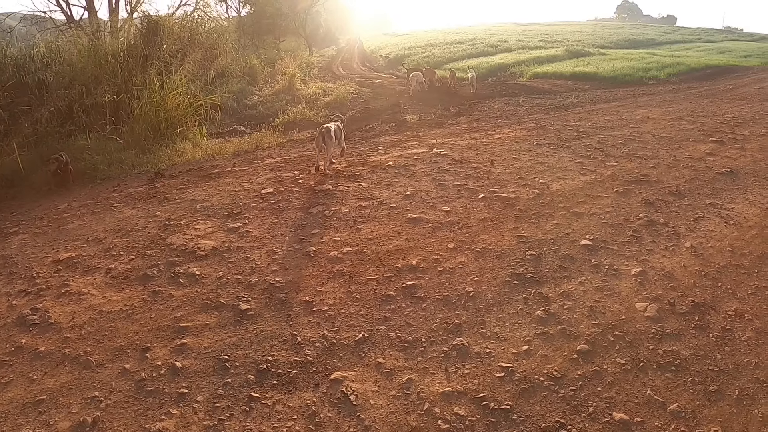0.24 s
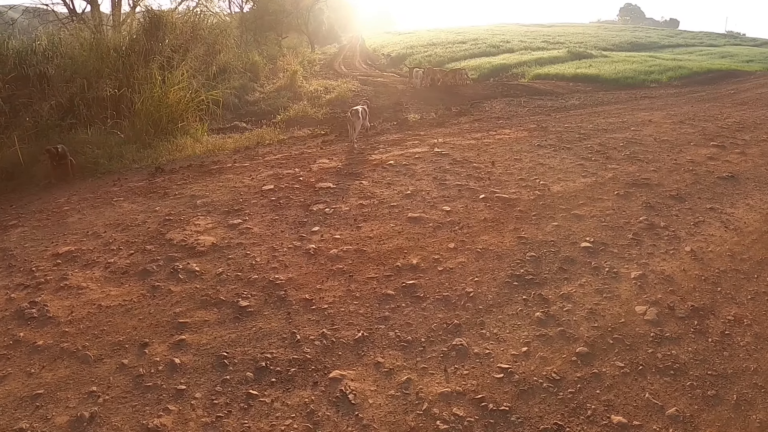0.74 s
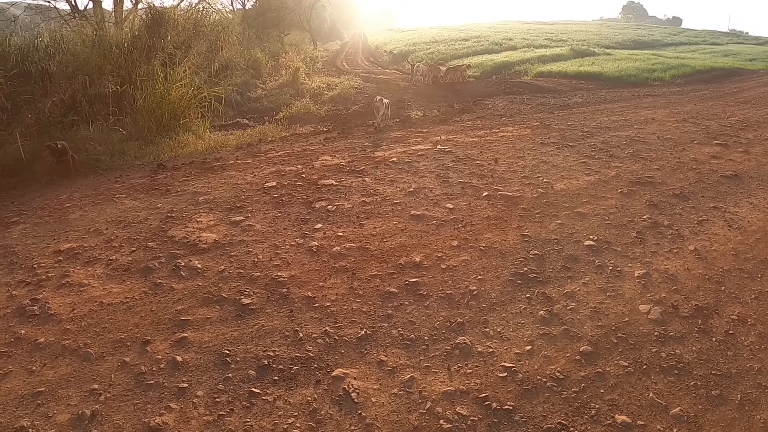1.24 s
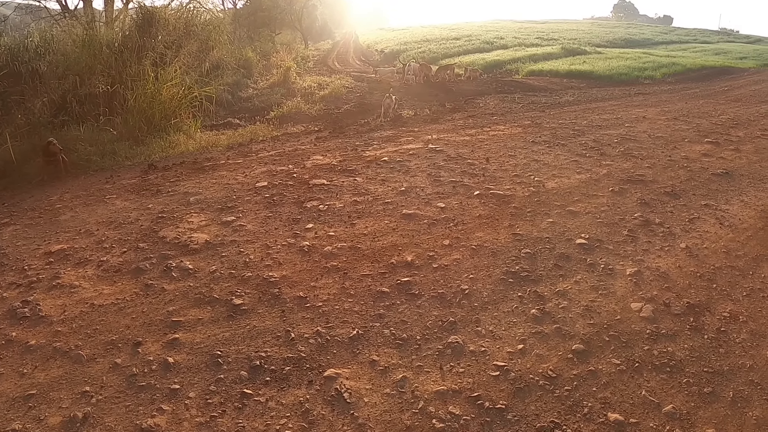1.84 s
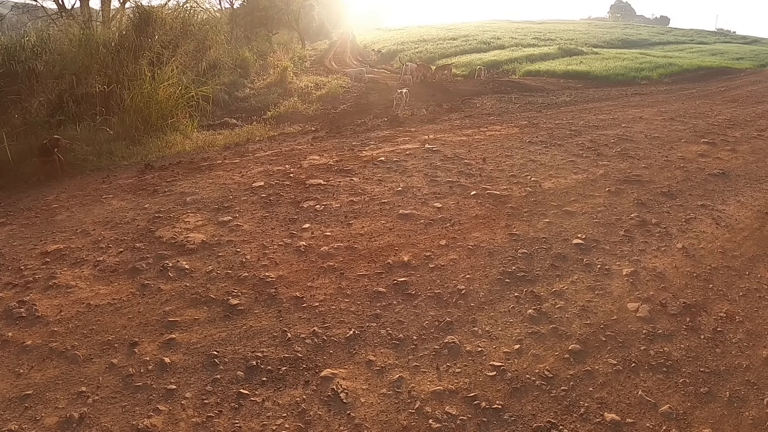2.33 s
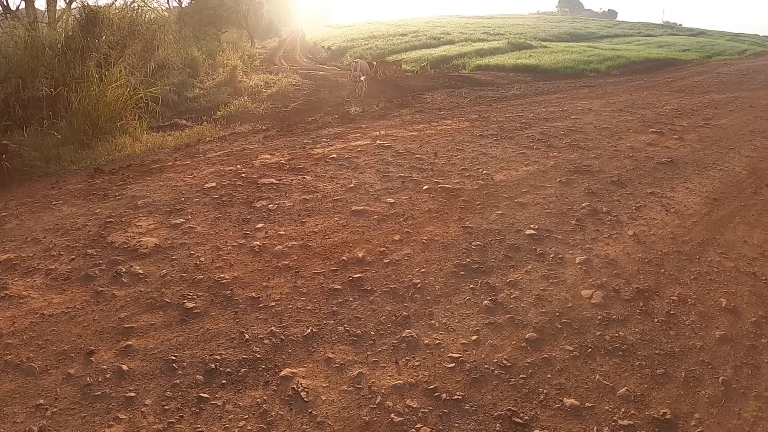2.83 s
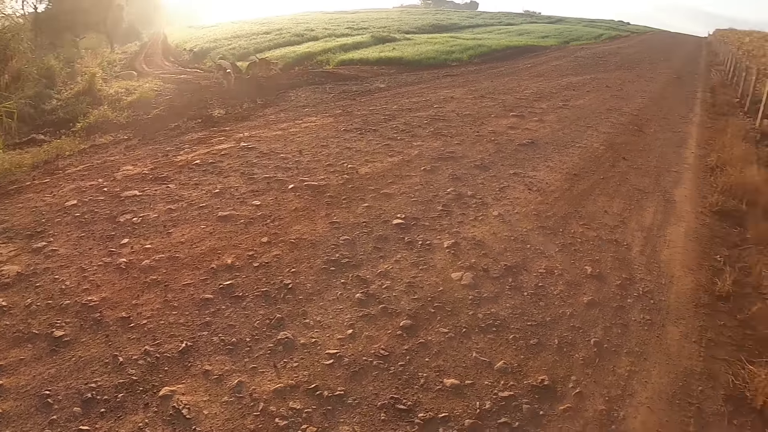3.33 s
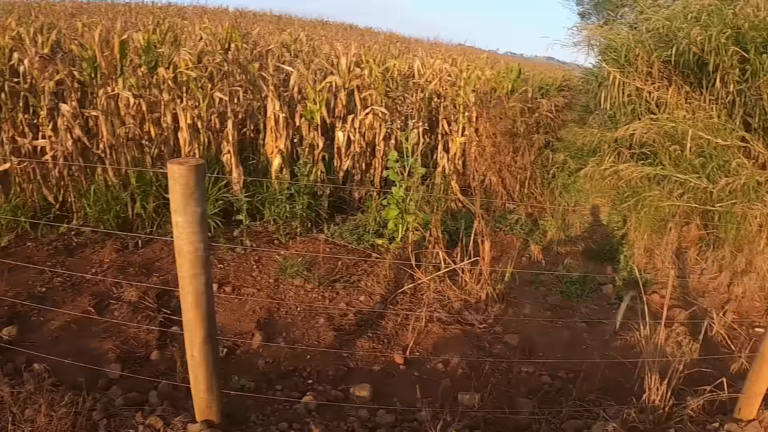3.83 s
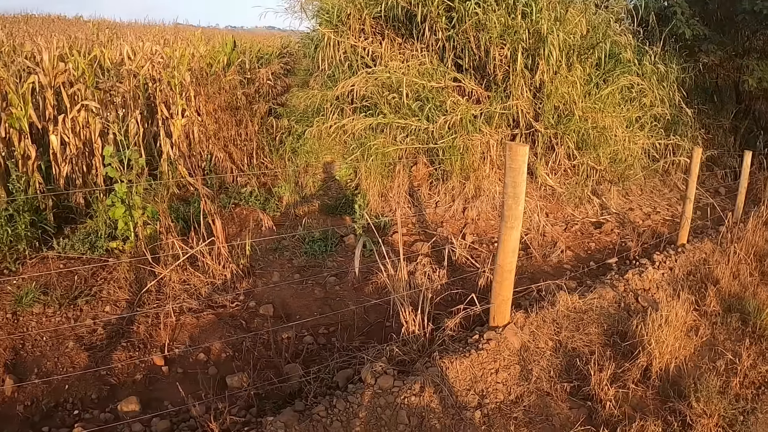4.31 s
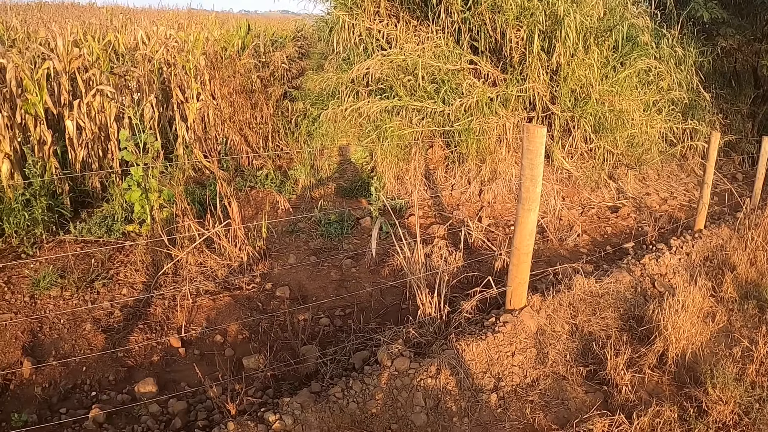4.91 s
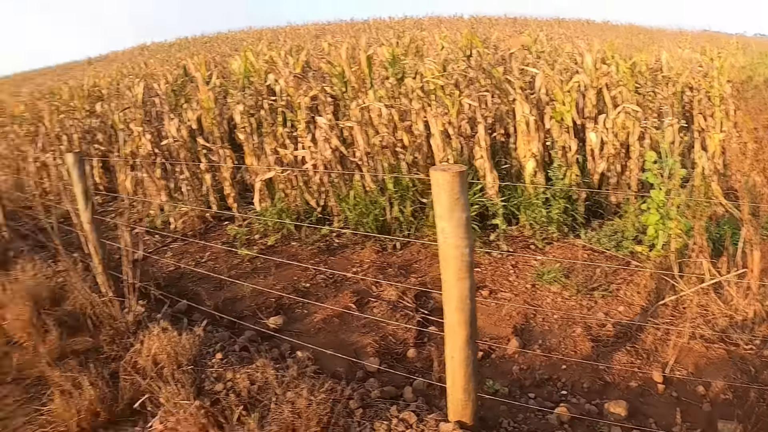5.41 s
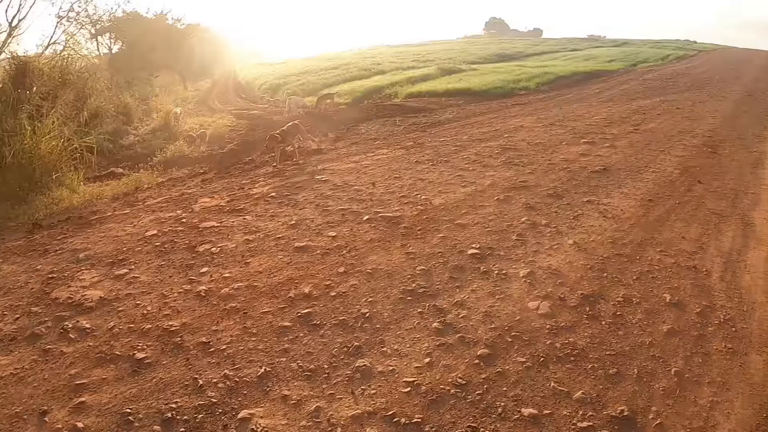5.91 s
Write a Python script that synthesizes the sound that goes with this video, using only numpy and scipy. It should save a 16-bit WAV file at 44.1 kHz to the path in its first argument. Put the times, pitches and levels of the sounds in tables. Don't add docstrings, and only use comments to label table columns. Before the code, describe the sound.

A dog's piercing two-toned yelp opens, thin whines and a drawn-out howl follow, then twigs and a loose strap crackle near the microphone in a quiet field.

```python
import sys
import numpy as np
from scipy import signal
from scipy.fft import rfft, irfft, next_fast_len
from scipy.io import wavfile
from scipy.ndimage import uniform_filter1d

SR = 44100
rng = np.random.default_rng(int(sys.argv[2]) if len(sys.argv) > 2 else 0)


def master(y):
    cut = np.clip(np.atleast_2d(y).T, -1, 1)
    pcm = np.round(cut * 32767)
    wavfile.write(sys.argv[1], SR, pcm.astype(np.int16))


N = 271391
T = np.arange(N) / SR
SQUEAK_PAN_DB = 5

# time_s, width_db
WIDTH = [(0, -51), (2.0, -25), (2.3, -15.5), (2.7, -6), (3.2, -1), (6.15, 0)]
# start_s, hold_s, wind_db, rustle_db
SWINGS = [(0.044, 0.0261, -95, -61.5), (0.131, 0.0227, -95, -66.5), (0.198, 0.1092, -96, -71),
          (3.305, 0.2594, -77, -97), (3.813, 0.21527, -51, -94), (4.599, 0.3924, -69, -74),
          (5.308, 0.1169, -52, -62.5), (5.541, 0.0306, -64.5, -64.5), (5.706, 0.00733, -37, -62),
          (5.786, 0.08247, -55.5, -58), (5.894, 0.07665, -60, -64.5), (6.133, 0.03994, -63, -58)]
# start_s, level_db, pitch_factor, length_factor, low_voice_db
CALLS = [
    (.178, -26, 1.001, 1.001, 0.4009),
    (4.012, -44.5, .95, 1.03, 5),
]


def undb(db):
    return np.exp(np.asarray(db) * (np.log(10) / 20))


def curve(rows):
    s, *columns = np.transpose(rows)
    return [np.interp(T, s, c) for c in columns]


def shape(points, hz):
    f, db = np.transpose(points)
    return np.interp(np.log(hz), np.log(f), db)


def swells(rows, rise_db_s, fall_db_s, floor_db):
    each = []
    for s, hold, db in rows:
        rise_db = rise_db_s * np.maximum(s - T, 0)
        fall_db = fall_db_s * np.maximum(T - s - hold, 0)
        each.append(db - rise_db - fall_db)
    return np.maximum(np.max(each, axis=0), floor_db)


def unit(x):
    return x / np.sqrt(np.mean(x ** 2))


def band(x, lo_hz, hi_hz):
    return signal.sosfilt(signal.butter(2, [lo_hz, min(hi_hz, .45 * SR)], "band", fs=SR, output="sos"), x)


def tinted(points, size=N):
    n = next_fast_len(size)
    hz = np.maximum(np.arange(n // 2 + 1) * SR / n, 1)
    return irfft(rfft(rng.standard_normal(n)) * undb(shape(points, hz)), n)[:size]


def walk(rate, size=N):
    knots = rng.standard_normal(int(size * rate / SR) + 2)
    return 1.2 * np.interp(np.arange(size) * (rate / SR), np.arange(len(knots)), knots)


def sparse_grains(size):
    struck = rng.random(size) < .08
    return rng.standard_normal((2, size)) * struck * undb(2.0 * rng.exponential(size=size))


def panned(x, pan_db):
    left = 2 / (1 + undb(-pan_db))
    return np.array([x * left, x * (2 - left)])


def spread(mid, side):
    return mid + side * np.array([[1], [-1]])


def stereo_width():
    return undb(curve(WIDTH)[0])


def strand(rows, smooth_s, edge_s):
    s, *columns = np.transpose(rows)
    at = np.arange(int(s[0] * SR), int(s[-1] * SR))
    gate = np.clip(np.minimum(at - at[0], at[-1] - at) / (edge_s * SR), 0, 1)
    smooth = [uniform_filter1d(np.interp(at / SR, s, c), int(smooth_s * SR), mode="nearest") for c in columns]
    return at, gate, smooth


def field():
    # frequency_hz, level_db_per_hz
    early_hush = [(30, 6.5), (60, -4.5), (115, -18), (270, -25.5), (500, -31), (600, -24.5), (950, -32),
                  (2100, -35.5), (3000, -34.5), (3800, -38.5), (7700, -45), (8800, -56.5), (12000, -64.5),
                  (15500, -97.5)]
    late_hush = [(30, -5), (85, -3.5), (180, -16.5), (430, -21.5), (750, -27.5), (1300, -25.5), (2700, -37),
                 (3500, -34), (4400, -42.5), (7700, -46), (8800, -59.5), (12000, -75), (15500, -94.5)]
    # frequency_hz, side_minus_mid_db
    side_tilt = [(60, -24), (110, -25.5), (200, -17), (380, -18), (700, -11.5), (1290, -9), (2380, -5),
                 (4400, -1), (8120, -0.5), (15000, 0)]
    # start_s, hold_s, lift_db
    stirs = [
        (.22, 0.025, 11.5),
        (5.66, 0.1, 7),
        (5.9, 0.43, 9.5),
    ]
    # start_s, hold_s, depth_db
    duck = [
        (2.72, 1, 2),
    ]
    # pitch_hz, level_db
    whine = [(151, -65.5), (614, -71), (1222, -78.5)]

    before = np.clip((2.25 - T) / 0.0674, 0, 1)
    stir_db, duck_db = swells(stirs, 22.71, 38.77, 0), swells(duck, 100, 9, 0)
    settle_db = 3.5 * np.clip((4.3273 - T) / 1, 0, 1)
    low_db = -68.5 + 0.6272 * stir_db - .3 * duck_db
    high_db = -81 + 0.8999 * stir_db - duck_db + settle_db

    n = next_fast_len(N)
    hz = np.maximum(np.arange(n // 2 + 1) * SR / n, 1)
    share = np.clip(np.log(hz / 900) / np.log(4), 0, 1)

    def levelled(points):
        low_ref, high_ref = shape(points, 399) + 24.038, shape(points, 7650) + 30.351
        return shape(points, hz) - (1 - share) * low_ref - share * high_ref

    early, late = levelled(early_hush), levelled(late_hush)
    colours = (early, late, late + shape(side_tilt, hz))
    noises = [rfft(rng.standard_normal(n)) * undb(db) * np.sqrt(SR / 2) for db in colours]
    out, width = np.zeros((2, N)), stereo_width()
    for octave in range(9):
        window = np.cos(np.pi / 2 * np.clip(np.log2(hz / 50) - octave, -1, 1)) ** 2
        mono, mid, side = (irfft(x * window, n)[:N] for x in noises)
        high = np.clip(np.log(50 * 2 ** octave / 900) / np.log(4), 0, 1)
        flicker_db = 2.1 * walk(7)
        gain = undb((1 - high) * low_db + high * high_db - 1.0647 * (octave < 7) + flicker_db)
        out += gain * spread(np.sqrt(before) * mono + np.sqrt(1 - before) * mid, width * side)
    hum = 0
    for f, db in whine:
        hum = hum + undb(db + 3.15 * walk(6.7354)) * np.sin(2 * np.pi * f * T + 0.2269 * walk(9.1754))
    return out + np.sqrt(2) * before * hum


def engine():
    # multiple_of_firing, level_db under the firing tone
    half_orders = [(.5, -14), (1.5, -10), (2.5, -21.5), (3, -27)]
    idle_hz, revved_hz = 34.613, 37.878
    rev = np.clip((T - 1.6) / .3, 0, 1)
    load = np.clip((T - 2.4) / 0.2127, 0, 1)
    hz = idle_hz + (revved_hz - idle_hz) * rev
    firing_db = -46.5 + 1 * load
    octave_db = -57.5 + 4 * load
    phase = 2 * np.pi * np.cumsum(hz * (1 + 0.014 * walk(13))) / SR
    out = undb(firing_db + 0.65 * walk(7.2)) * np.sin(phase)
    out += undb(octave_db + 1.4 * walk(5.3)) * np.sin(2 * phase + 1)
    for k, db in half_orders:
        out += undb(firing_db + db + 0.86 * walk(13.0)) * np.sin(k * phase + 0.58 * walk(2.3))
    return np.sqrt(2) * out


def insect():
    # start_s, hold_s, level_db
    pulses = [
        (.4, 0.05, -67.5),
        (.966, 0.04, -68.5),
        (1.628, 0.03, -68.5),
        (2.2, .01, -67.5),
    ]
    # multiple_of_wingbeat, level_db
    orders = [(2, 0), (4, -8), (6, -20), (8, -19), (9, -26), (10, -30)]
    # start_s, end_s
    start_s, end_s = (.4, 2.2)
    gate = np.clip(np.minimum(T - start_s, end_s - T) / 0.0283, 0, 1)
    wingbeat_hz = 1414 * (1 + .0012 * walk(3))
    phase = 2 * np.pi * np.cumsum(wingbeat_hz) / SR
    stack = sum(undb(db + 2.6 * walk(25)) * np.sin(k * phase) for k, db in orders)
    return np.sqrt(2) * gate * undb(swells(pulses, 40, 26, -76)) * stack


def wind():
    db = swells([(s, hold, wind_db) for s, hold, wind_db, _ in SWINGS], 140, 140, -90.5)
    ports = [undb(db + 1.6 * walk(14)) * unit(band(rng.standard_normal(N), 8, 100)) for _ in range(2)]
    return np.array(ports)


def rustle():
    db = swells([(s, hold, rustle_db) for s, hold, _, rustle_db in SWINGS], 284.6, 169.7, -89.5)
    out = 0
    for lo_hz, hi_hz, part_db in ((175.04, 598.4, 2.0), (600, 1200, -10.0)):
        first, second = sparse_grains(N)
        ports = (first, 1.1 * first + 0.32 * second)
        left, right = (unit(band(band(g, lo_hz, hi_hz), 0.55 * lo_hz, 1.1 * hi_hz)) for g in ports)
        out = out + undb(db + part_db + 4.5 * walk(14)) * np.array([left, 0.95 * right])
    return out


def leaves():
    # start_s, hold_s, level_db
    brushes = [
        (5.645, .08, -74.5),
        (5.78, 0.0199, -81.5),
        (5.86, 0.0904, -79.5),
        (5.97, 0.0536, -80),
        (6.1, .05, -75.5),
    ]
    grains = rng.standard_normal((2, N)) * undb(2.0 * rng.exponential(size=N))
    hiss = np.array([unit(band(band(g, 6000, 12000), 5000, 13500)) for g in grains])
    return undb(swells(brushes, 606, 254.5, -110) + 2.0 * walk(60)) * hiss


def scrapes():
    # start_s, hold_s, level_db, centre_hz
    strokes = [(0.038, 0.02345, -61.5, 1486), (0.13, 0.034, -65.5, 1500), (4.12, .1, -59, 1480),
               (5.31, 0.1435, -65, 1473), (5.51, 0.08208, -62, 1418), (5.63, 0.10754, -63, 1492),
               (5.669, 0.0599, -65.5, 3495), (5.791, 0.04108, -56.5, 1881), (5.829, .04, -61, 2583),
               (5.879, 0.05563, -55, 2166), (5.96, 0.0403, -58.5, 1583), (6.098, 0.051, -58.5, 2314)]
    out = np.zeros((2, N))
    for s, hold, db, hz in strokes:
        at = slice(max(int((s - .1) * SR), 0), int((s + hold + .2) * SR))
        n = len(T[at])
        first, second = sparse_grains(n)
        ports = (first, 1.155 * first + 0.3117 * second)
        left, right = (unit(band(band(g, 0.6801 * hz, 1.2559 * hz), .5 * hz, 2 * hz)) for g in ports)
        level_db = swells([(s, hold, db)], 443.2, 279.8, -120)[at] + 2.63 * walk(39.3, size=n)
        out[:, at] += undb(level_db) * np.array([1.06 * left, 0.6848 * right])
    return out


def ticks():
    # start_s, peak_db, centre_hz, low_band_db, left_minus_right_db
    hits = [(0.1169, -24.5, 2338, -32, 0), (3.931, -56.5, 1134, -43, 0), (4.186, -42, 1400, -60, 2.5),
            (4.222, -45, 1800, -62, 2), (4.36, -50, 1500, -66, 2), (4.384, -42, 1350, -62, 2),
            (4.485, -49, 1267, -73, -1), (4.6454, -49, 1334, -51, 3), (5.37, -55.5, 1421, -62.5, 9),
            (5.4327, -40.5, 2596, -57.5, 18.5), (5.4431, -41, 3705, -53, 15), (5.4561, -56.5, 1500, -60, 7),
            (4.655, -50.5, 2500, -67, 3.5), (5.5, -54, 1449, -67, 5.5), (5.551, -39.5, 2546, -62, 15.5),
            (5.5661, -48.5, 1337, -59, 10.5), (5.6485, -43, 1010, -44, 5), (5.657, -32, 3532, -64, 16.5),
            (5.781, -34, 2895, -44.5, 11), (5.8671, -31.5, 4611, -63.5, 3.5),
            (5.8762, -27, 2485, -33.5, 3.5), (5.9691, -38, 1597, -54, 2.5), (5.9859, -30.5, 1458, -44, 1.5),
            (6.0018, -37.5, 3612, -60.5, 5), (6.089, -41.5, 2198, -66.5, 3.5), (6.0951, -22, 3900, -48, 3)]
    out, t = np.zeros((2, N + 2000)), T[:1500]
    for s, db, hz, low_db, pan_db in hits:
        envelope = np.exp(-t / 0.0019) * undb(3.509 * walk(1476.7, size=len(t))) + 0.0697 * np.exp(-t / 0.01783)
        burst = rng.standard_normal(len(t)) * envelope * np.clip(t / 0.0008458, 0, 1)
        burst[round(.0009 * SR)] += 4.0
        tick = 0
        for level_db, lo, hi in ((db, 0.5368 * hz, 1.6679 * hz), (low_db, 250, 800)):
            ring = band(band(burst, lo, hi), 0.4205 * lo, 1.6 * hi)
            tick = tick + undb(level_db) * ring / np.abs(ring).max()
        out[:, int(s * SR):int(s * SR) + len(t)] += panned(tick, pan_db)
    return out[:, :N]


def thump():
    # time_s, peak_db, pitch_hz
    s, db, hz = (5.767, -23, 356.93)
    u = T - s
    push = -.7 * np.exp(np.minimum(u, 0) / 0.007805) * (u < 0)
    decay = (u >= 0) * np.exp(-np.maximum(u, 0) / 0.0018226)
    knock = push + decay * np.sin(2 * np.pi * hz * u - .8)
    return panned(undb(db) * uniform_filter1d(knock, size=7), 5.05)


def snaps():
    # start_s, peak_db
    hits = [(0.117, -38.5), (2.383, -52.5), (3.0535, -57.5), (4.6417, -53), (5.4323, -59), (5.443, -58.5),
            (5.5505, -65), (5.5653, -55.5), (5.6579, -42), (5.6634, -53.5), (5.7678, -54), (5.7809, -40.5),
            (5.869, -40), (5.8765, -34), (5.9696, -41.5), (5.9864, -56), (6.003, -40.5), (6.087, -42.5),
            (6.0955, -29)]
    out, t, width = np.zeros((2, N + 2000)), T[:1500], stereo_width()
    envelope = np.clip(t / 0.00071, 0, 1) * (np.exp(-t / 0.0011) + 0.044 * np.exp(-t / .012))
    for s, db in hits:
        i = int(s * SR)
        bursts = rng.standard_normal((2, len(t))) * envelope
        mid, side = (band(band(x, 4600, 12000), 4000, 15000) for x in bursts)
        out[:, i:i + len(t)] += undb(db - 8.5) * spread(mid, .9 * width[i] * side) / np.abs(mid).max()
    return out[:, :N]


def crops(x):
    t = T[:int(.6 * SR)]
    decay = undb(-60 * t / 0.5) * np.clip(t / 0.013, 0, 1)
    tails = [unit(band(rng.standard_normal(len(t)), 230, 4700)) * decay for _ in range(2)]
    mid, side = (signal.fftconvolve(x.mean(axis=0), tail)[:N] for tail in tails)
    return undb(-50.5) * spread(mid, .4 * stereo_width() * side)


def puffs():
    # start_s, hold_s, level_db
    breaths = [(.25, 0.044, -70.5), (1.82, 0.011, -65), (2.15, 0.02916, -60), (2.35, 0.3807, -69.5),
               (3.92, 0.0204, -61.5), (3.98, 0.2184, -53.5), (4.2, 0.05664, -53.5), (4.32, 0.02524, -61),
               (4.6, 0.0856, -64.5)]
    # frequency_hz, level_db_per_hz
    nose = [(500, -17.5), (900, -8), (1300, 0), (2200, -5), (3500, -1.5), (4500, -10.5), (7500, -20),
            (9000, -32), (14000, -67)]
    mid, side = (unit(tinted(nose)) * undb(2.6 * walk(25)) for _ in range(2))
    return undb(swells(breaths, 120.85, 110, -88.5)) * spread(mid, .3 * stereo_width() * side)


def strain():
    # start_s, hold_s, level_db
    bursts = [(.215, 0.02603, -58.5), (.265, 0.04206, -50.5), (.36, 0.02247, -52), (2.74, 0.09712, -68.5),
              (3.2, .14, -72.5), (4.65, 0.04945, -73), (4.1, 0.0453, -69)]
    hiss = band(band(rng.standard_normal(N), 3600, 7300), 3000, 9500) * undb(4.0 * walk(400))
    return panned(undb(swells(bursts, 700, 450, -110)) * unit(hiss), SQUEAK_PAN_DB * stereo_width() / 2)


def flutter():
    # time_s, level_db, pitch_hz
    s, db, hz = (4.58, -66, 5700)
    swell = np.exp(-((T - s) / 0.035) ** 2) * (1 + np.sin(2 * np.pi * 90 * T))
    return undb(db) * swell * np.sin(2 * np.pi * hz * T + 2.68 * walk(300))


def notes():
    # time_after_start_s, pitch_hz, level_db under the call
    opening = [(0, 4292, -31), (.012, 4548, -20), (0.022, 3757, -6.5), (.034, 3557, -4.5),
               (.05, 3486, -7.5), (.057, 3611, -8.5), (.064, 3986, -12.5)]
    branch = [(.062, 3474, -20), (0.07, 3773, -15.5), (.08, 3694, -15.5), (.087, 3590, -13)]
    catch = [(.086, 3340, -14), (0.094, 3190, 0), (0.112, 3197, 0), (.119, 3276, -11)]
    fall = [(0.113, 3358, -10.5), (.12, 3463, -5.5), (0.14, 3199, -3), (.15, 3054, -6), (.164, 2887, -4.5),
            (.18, 2844, -4.5), (0.198, 2382, -7.5), (0.213, 1740, -17)]
    low_voice = [(.034, 2516, -21), (.052, 2200, -16), (0.067, 1893, -9.5), (0.096, 1857, -10.5),
                 (.112, 2299, -13), (.13, 2140, -13), (.138, 2150, -24), (.165, 2230, -25),
                 (0.181, 2240, -38.5)]
    split = [(.042, 4713, -21.5), (.053, 4470, -16.5), (.062, 3964, -13.5)]
    note_octave_db = [-38, -28, -17, -20, -17]
    # high_voice_multiple, low_voice_multiple, level_db over their summed levels
    combined = [(1, 1, -9), (2, -1, -9), (2, 1, -25), (3, -1, -18), (3, 0, -36)]
    # time_s, pitch_hz, level_db
    arch = [(2.32, 1198, -73.5), (2.35, 1483, -69), (2.4, 1633, -63), (2.47, 1677, -63.5),
            (2.525, 1633, -65), (2.565, 1243, -78)]
    droop = [(1.775, 3600, -67.5), (1.81, 3625, -59.5), (1.85, 3283, -54), (1.87, 2257, -64)]
    droop_edge = [(1.765, 3450, -68), (1.8, 3276, -69), (1.835, 3191, -63.5)]
    waver = [(2.056, 3846, -61.5), (2.075, 3500, -57.5), (2.09, 3280, -56.5), (2.11, 3550, -57.5),
             (2.125, 3912, -51), (2.137, 3838, -51), (2.153, 3285, -56.5)]
    tail = [(2.129, 3244, -58), (2.144, 2894, -50), (2.16, 3050, -51.5), (2.175, 2644, -54),
            (2.206, 2271, -61.5)]
    late_tail = [(2.17, 3130, -56.5), (2.2, 2784, -53), (2.228, 2329, -56), (2.245, 1862, -62.5)]
    under = [(2.095, 2070, -60.5), (2.115, 1790, -54), (2.14, 1861, -58), (2.16, 2034, -53),
             (2.175, 2049, -66)]
    # start_s, length_s,
    # from_hz, to_hz, level_db
    squeaks = [(1.786, .083, 2039, 1411, -63.5), (2.562, .05, 3695, 4668, -54.5),
               (2.9, 0.076, 1151, 1100, -47.5), (2.975, .093, 1069, 1001, -44.5),
               (4.513, 0.039, 4161, 3330, -54.5), (4.661, 0.02595, 2390, 2533, -61),
               (4.679, 0.023, 2571, 3575, -58), (4.69, 0.01714, 3602, 3477, -55.5),
               (5.626, 0.028, 5500, 6749, -75), (3.717, .024, 6254, 5772, -66)]

    out = [(arch, 15.5, 2.2, 1), (droop, -39, .1, .1), (droop_edge, -39, .1, 0)]
    out += [(rows, -46, -1.5, .5) for rows in (waver, tail, late_tail, under)]
    width = stereo_width()
    high_voice = [opening, branch, catch, fall]
    low_s, low_hz, low_level_db = np.transpose(low_voice)
    for start, call_db, factor, stretch, low_db in CALLS:
        pan_db = SQUEAK_PAN_DB * width[int(start * SR)]

        def placed(rows, lift_db):
            return [(start + stretch * s, factor * hz, db + call_db + lift_db) for s, hz, db in rows]

        for rows, octave_db in zip(high_voice + [low_voice], note_octave_db):
            out.append((placed(rows, low_db if rows is low_voice else 0), octave_db, pan_db, 1))
        out.append((placed(split, 0), -30, pan_db, .3))
        for rows in high_voice:
            for m, k, db in combined:
                beats = []
                for s, hz, d in rows:
                    low_now_db = np.interp(s, low_s, low_level_db, left=-60) + low_db
                    beat_hz = m * hz + k * np.interp(s, low_s, low_hz)
                    beats.append((s, beat_hz, d + 0.6531 * abs(k) * low_now_db))
                out.append((placed(beats, db), -60, pan_db, 0))
    for s, length, from_hz, to_hz, db in squeaks:
        edge_db = db - 7.5
        middle = (s + .6 * length, .4 * from_hz + .6 * to_hz, db)
        rows = [(s, from_hz, edge_db), middle, (s + length, to_hz, edge_db)]
        out.append((rows, -25, SQUEAK_PAN_DB * width[int(s * SR)], 1))
    return out


def whistles():
    # power, level_db
    bending = [(2, -17.5), (3, -33.5), (4, -44.5), (5, -60)]
    # time_after_start_s, half_width_s, depth_db
    catches = [(.0195, .0012, 14), (.0245, .0012, 14), (.0455, .002, 14), (.131, .002, 12),
               (.149, .003, 16), (.174, .002, 12), (.184, .002, 8), (.1895, .0015, 9)]
    out, plain = np.zeros((2, N)), np.zeros(N, complex)
    start, _, _, stretch, _ = CALLS[0]
    caught_db = sum(depth_db * np.exp(-((T - start - stretch * s) / half) ** 2) for s, half, depth_db in catches)
    for rows, octave_db, pan_db, share in notes():
        at, gate, (hz, db) = strand(rows, 0.0039, 0.0026)
        n = len(at)
        phase = 2 * np.pi * np.cumsum(hz * (1 + .007 * walk(200, size=n))) / SR
        rasp = np.abs(1 + .16 * walk(1400, size=n))
        size = np.sqrt(2) * gate * undb(db - caught_db[at] + 1.2 * walk(130, size=n)) * rasp
        plain[at] += share * size ** 0.57504 * np.exp(1j * phase)
        closing_db = 0.46 * max(octave_db + 10.0, 0) * np.log2(hz / hz.min())
        tone = np.sin(phase + 0.929 * (1 - share) * walk(300, size=n))
        octave_gain = undb(octave_db - closing_db + 2.0 * walk(90, size=n))
        octave = octave_gain * np.sin(2 * phase + 0.27 * walk(300, size=n))
        out[:, at] += panned(size * (tone + octave), pan_db)

    swell = uniform_filter1d(np.abs(plain), int(.01 * SR))
    on = np.flatnonzero(swell > 1e-4)
    ragged = undb(2.6 * walk(200, size=len(on))) * swell[on] ** 2.1556
    smear = np.exp(.7j * walk(600, size=len(on)))
    for power, db in bending:
        product = (plain[on] / swell[on]) ** power * smear ** (power - 1)
        out[:, on] += undb(db) * ragged * product.imag
    out += flutter()
    return out + 0.18 * np.roll(out, int(0.0029 * SR), axis=1)


def howl():
    # time_s, pitch_hz, level_db
    first_breath = [(2.675, 772.1, -65.5), (2.69, 842, -34.5), (2.714, 831.2, -24.5), (2.748, 746.3, -18.5),
                    (2.812, 641.7, -36), (2.894, 730.5, -24.5), (2.93, 759.8, -24.5), (3.046, 758.5, -30.5),
                    (3.105, 807.9, -39)]
    second_breath = [(3.122, 811, -34.5), (3.144, 771.5, -23.5), (3.201, 783.5, -23), (3.245, 763.9, -24.5),
                     (3.276, 768.1, -28.5), (3.301, 776.1, -23.5), (3.34, 723.4, -28), (3.39, 710, -29.5),
                     (3.47, 695.4, -29)]
    whimper = [(3.551, 676.5, -32.5), (3.621, 689.2, -35), (3.689, 723, -34.5), (3.715, 668.2, -54.5),
               (3.81, 701.7, -58), (3.9, 695.7, -67), (3.947, 619.3, -59.5)]
    # pitch_hz, octave_db, twelfth_db under the fundamental
    mouth = [(649.6, -6.5, -17.5), (669.5, -13, -22), (710, -14, -25.5), (726.25, -30, -27.5),
             (774.91, -37.5, -38), (795.8, -32.5, -34), (811, -22, -28.5), (842.07, -22, -26.5)]
    # time_s, throat_resonance_factor, high_partials_db
    mouth_open = [(2.69, 0.842, 4), (2.73, 0.7778, 3.5), (2.77, 1.102, -8), (2.9, 1.03, -12),
                  (3.15, 1.056, -11), (3.3, 1.0325, -3), (3.45, 1.0, -3), (3.55, 0.954, -5),
                  (3.7, 0.987, -1)]
    # frequency_hz, level_db
    throat = [(1000, 1), (2000, -9), (2900, -27.5), (3600, -41), (4300, -35), (5000, -26.5), (5800, -35),
              (7000, -41), (9000, -58.5)]
    # start_s, hold_s, level_db
    halves = [
        (2.69, 0.047, -53),
        (2.924, 0.0088, -41),
        (3.142, 0.032, -36),
        (3.24, 0.004994, -41.5),
    ]
    # start_s, hold_s, level_db
    chaos = [
        (2.685, 0.001864, -48),
        (2.755, 0.0018, -49.5),
        (2.78, 0.09512, -59.5),
        (2.95, 0.10535, -56.5),
        (3.205, 0.06, -45.5),
        (3.27, 0.05741, -50.5),
    ]
    out = np.zeros(N)
    at, gate, (hz, db1) = strand(first_breath + second_breath + whimper, 0.0021, 0.0071)
    pitch, *overtones_db = np.transpose(mouth)
    db2, db3 = (db1 + np.interp(hz, pitch, db) for db in overtones_db)
    half_db = swells(halves, 1400, 230, -85)[at]
    chaos_db = swells(chaos, 760, 470, -75.5)[at]
    n = len(at)
    phase = 2 * np.pi * np.cumsum(hz * (1 + 0.0025 * walk(80, size=n))) / SR
    tone = undb(db1 + (1.0 + 2.7 * (db1 < -48)) * walk(45, size=n)) * np.sin(phase)
    tone += undb(db2 + 2.0 * walk(50, size=n)) * np.sin(2 * phase)

    blur = 0.14 + 0.45 * np.clip((chaos_db + 66) / 12, 0, 1)
    factor, high_db = (c[at] for c in curve(mouth_open))
    for k in range(3, 11):
        throat_db = high_db + shape(throat, k * hz / factor) - shape(throat, 3 * hz)
        gain = undb(db3 + (k > 3) * throat_db + 3.5 * walk(30, size=n))
        tone += gain * np.sin(k * phase + blur * (k - 1.5) * walk(110, size=n))
    for k in np.arange(1.5, 5):
        throat_db = shape(throat, k * hz) - shape(throat, 1.4573 * hz)
        gain = undb(half_db + 2.5 - 8.0 * (k > 2) + throat_db + 1.1 * walk(24, size=n))
        tone += gain * np.sin(k * phase)

    jumps = 0
    for k in (1.27, 1.55, 1.8, 2.3):
        line = np.sin(k * phase + 1.8 * walk(70, size=n))
        jumps = jumps + line * undb(shape(throat, k * hz) + 3.5 * walk(40, size=n))
    hiss = unit(band(band(tinted(throat, size=n), 850, 8100), 850, 8100))
    hiss = hiss * (1 + 0.24 * np.sin(phase / 2)) * undb(2.3 * walk(90, size=n))
    tone += undb(chaos_db) * (0.69 * hiss + 0.8038 * jumps)
    out[at] = np.sqrt(2) * gate * tone
    return panned(out, np.interp(T, [2.7, 3.6], [2.4, 4.4]))


def scene():
    background = field() + engine() + insect() + wind()
    handling = rustle() + leaves() + scrapes() + ticks() + thump() + snaps()
    near, far = whistles(), howl()
    echo = crops(near * (.2 + walk(350)) + 0.45 * far * (.6 + .8 * walk(45)))
    return background + handling + echo + puffs() + strain() + near + far


def band_limit(x):
    return signal.sosfilt(signal.butter(12, 15600, fs=SR, output="sos"), x)


def record(dry):
    change_s = 1.996
    length_s = np.where(T < change_s, .007, .003)
    fade = np.clip((np.abs(T - change_s) - .007) / length_s, 0, 1)
    return band_limit(dry * fade)


dry = scene()
out = record(dry)
master(out)
```